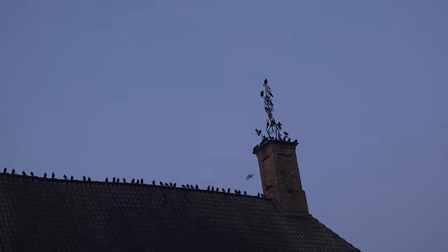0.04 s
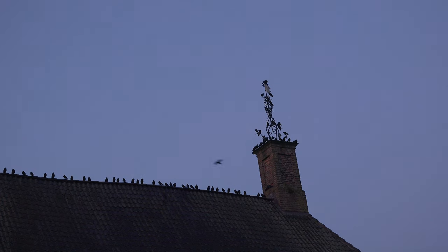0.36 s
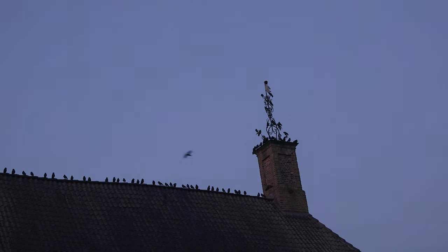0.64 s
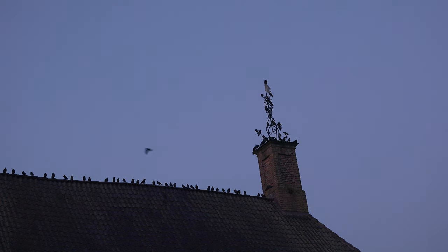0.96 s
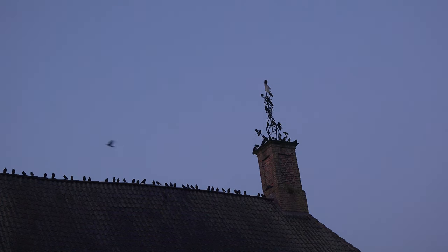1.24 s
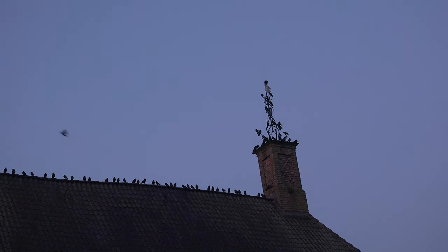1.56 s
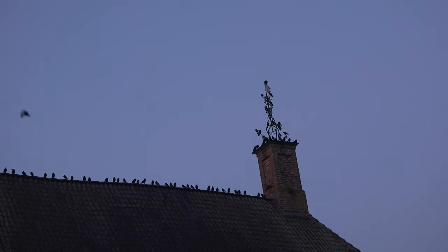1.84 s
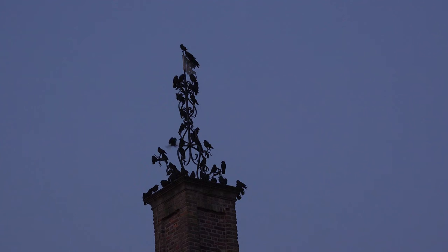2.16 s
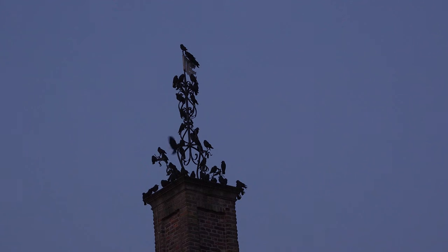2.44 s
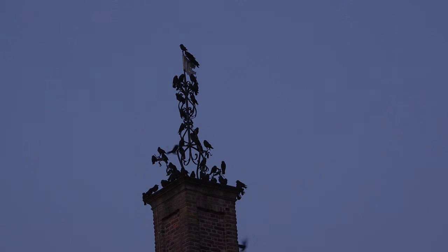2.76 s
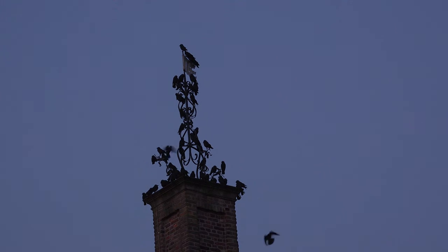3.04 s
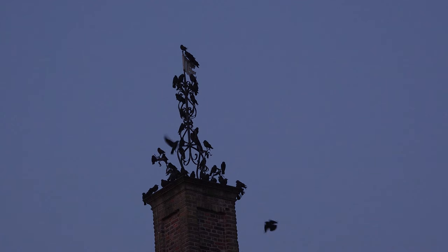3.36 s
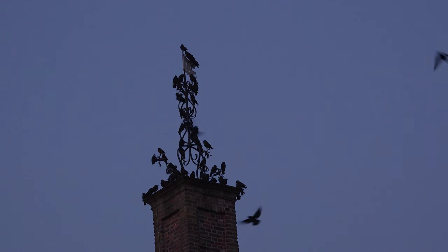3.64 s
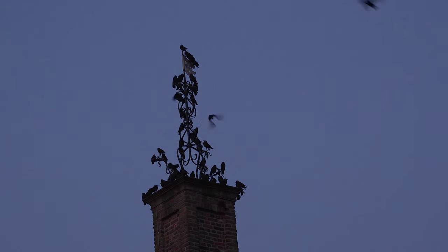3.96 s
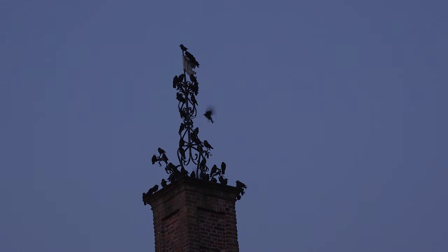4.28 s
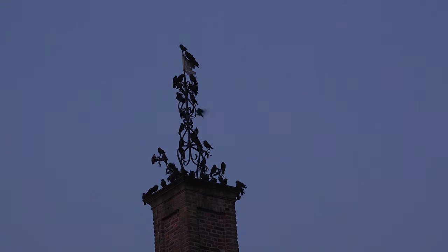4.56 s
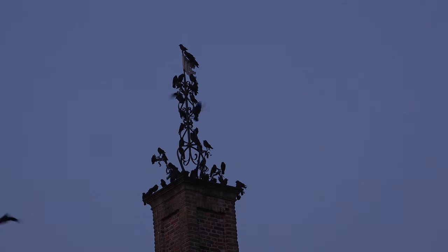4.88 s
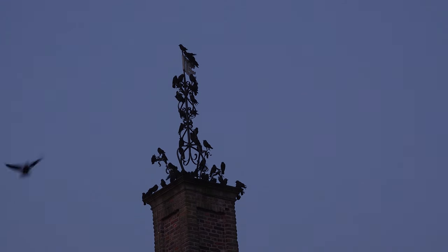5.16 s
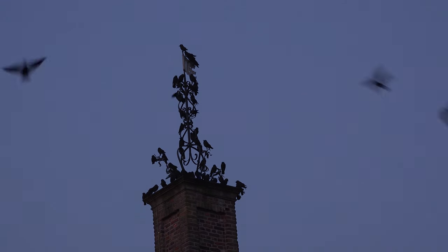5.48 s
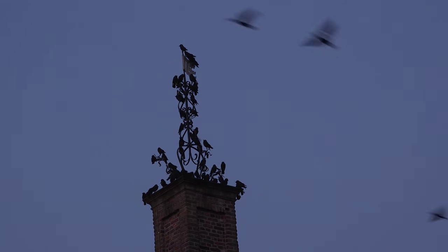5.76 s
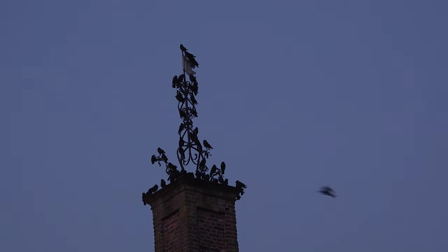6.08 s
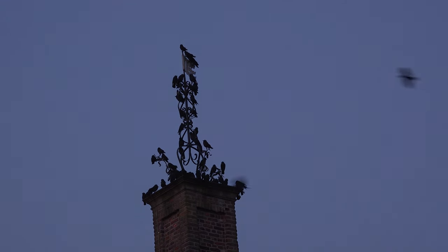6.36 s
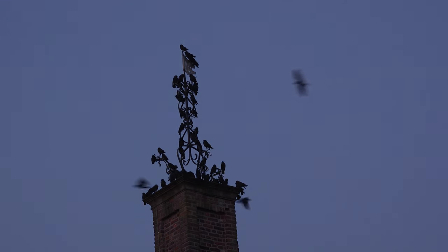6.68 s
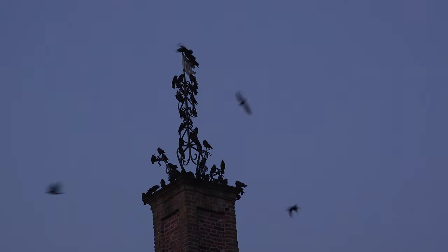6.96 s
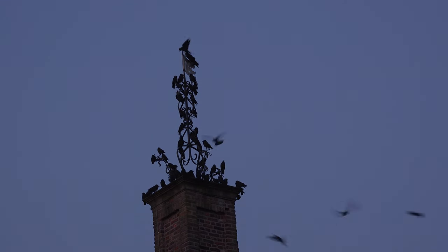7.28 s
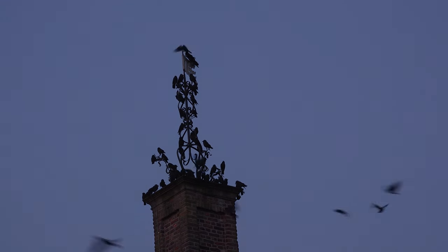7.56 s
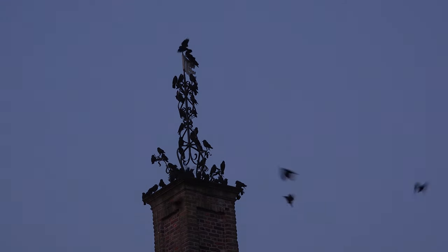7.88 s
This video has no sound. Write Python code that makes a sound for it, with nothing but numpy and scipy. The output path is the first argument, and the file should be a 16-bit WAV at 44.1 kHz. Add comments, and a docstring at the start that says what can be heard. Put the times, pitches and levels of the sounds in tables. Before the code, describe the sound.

Jackdaws call from a rooftop with short, harsh cries that drop in pitch, each echoing briefly off nearby walls. The calls are scattered at first, with a faint airy rustle, then become louder and denser from about three seconds as a more distant flock chatters behind them. Small birds add a few thin whistles. A quiet town murmur and a low, distant engine hum lie underneath.

```python
"""At dusk a town murmurs, with a distant engine and an idling machine humming low in it.
Jackdaws call from a roof ridge: each 'tchak' is a harmonic cry that plunges as the syrinx slackens,
and roofs and walls reflect it a moment later. Small birds whistle thinly further off.
An airy rustle swells and fades over the first three seconds, and the calls thicken as birds fly in.
Past halfway the engine comes up, then slowly gathers speed under the chattering flock."""
import sys
import numpy as np
from scipy import signal
from scipy.fft import rfft, irfft, next_fast_len
from scipy.io import wavfile

SR = 44100
rng = np.random.default_rng(int(sys.argv[2]) if len(sys.argv) > 2 else 0)


def wav_record(signal):
    """Record a signal, one row per channel, as 16-bit PCM in the file named by sys.argv[1]."""
    frames = np.transpose(np.atleast_2d(signal))
    bounded = np.clip(frames, -1, 1)
    # unit amplitude maps onto the largest positive 16-bit level
    quanta = np.round(bounded * 32767).astype(np.int16)
    wavfile.write(sys.argv[1], SR, quanta)


N = 353682
TOP_HZ = 15750
USUAL_DB, USUAL_FALL_S, USUAL_HZ = -32, .05, 1320  # an ordinary jackdaw call

# spectrum of the town's murmur: (frequency [Hz], relative density [dB])
TOWN_SPECTRUM = [(15, -42), (25, -23), (42, -5), (107, 2.5), (169, 2), (260, -10.5), (421, -12.5),
                 (826, -11), (1340, -8.5), (1660, -11), (2360, -9), (3170, -14), (5010, -16.5),
                 (10100, -31), (12800, -29), (15500, -39)]
# distant engine: (time [s], firing rate [Hz], fundamental level [dB], second harmonic re first [dB])
ENGINE_RUN = [(0, 62, -64, 6), (4.55, 62.5, -63, -6), (4.7, 62.6, -53.5, -14), (6, 62.7, -54, -28),
              (6.6, 63.4, -58.5, -15), (7.3, 69.6, -58, -20), (7.55, 72, -63.5, 16.5), (8.02, 76, -59, -1)]
# second harmonic of the idling machine: (time [s], level [dB])
HUM_LEVEL = [(0, -57), (2.3, -62), (2.7, -48.5), (4.6, -52), (6.3, -56), (8.02, -76)]
# resonances of throat and bill for a call at USUAL_HZ: (frequency [Hz], gain [dB])
THROAT_RESONANCES = [(380, -22.5), (560, -16), (800, -22.5), (1200, -7.5), (1550, 2.5), (2000, -1),
                     (2500, 2.5), (3150, -11.5), (4000, -8.5), (5200, -8), (6700, -17), (8100, -21.5),
                     (10000, -34.5), (14000, -50.5), (16000, -64)]
# near calls: (time [s], starting pitch [Hz], fall time [s], starting roughness [0-1], level [dB],
# bill opening [dB], treble [dB]); an open bill turns 'kya' to 'chak', a bird facing us has more treble
JACKDAW_CALLS = [(.013, 1286, 0.043, .03, -46.5, 0.5, -12), (.189, 1316, 0.047, 0.045, -39.5, 3, -19),
                 (.385, 1234, 0.028, 0.14, -34.5, 4, -4), (.588, 1420, 0.037, .02, -28.5, -15, -23),
                 (.619, 1435, 0.046, 0.25, -31, -5.5, -6), (.63, 1060, 0.041, .1, -36.5, 3.5, -18),
                 (.668, 1313, 0.037, .15, -39.5, -7.5, -6), (0.674, 997, 0.033, .06, -33.5, -0.5, -35),
                 (0.725, 980, 0.042, .15, -57, 4.5, -17), (0.88, 1500, 0.054, 0.17, -45, -11, -3),
                 (0.905, 1327, 0.046, 0.19, -43, 13, -6), (1.271, 1403, 0.09, 0.49, -35, -4, -10),
                 (1.473, 1306, 0.077, 0.43, -44, 1.5, -10), (1.793, 1265, 0.059, 0.32, -38, 7.5, 3.5),
                 (2.186, 1252, 0.036, 0.86, -36.5, -0.5, 4), (2.285, 1370, 0.028, 0.64, -33.5, 9, 2),
                 (2.308, 1103, 0.048, .08, -36, 4, -20), (2.43, 1358, 0.033, 0.5, -34, 0, 5),
                 (2.466, 1290, 0.076, 0.44, -40, 9.5, 3), (2.965, 1369, 0.026, 0.26, -30, -3.5, -7),
                 (3.003, 1338, 0.045, 0.024, -24.5, -2.5, 3.5), (3.039, 1246, 0.019, 0.46, -32, 5, 13),
                 (3.228, 1230, 0.089, 0.52, -41, 5.5, 4), (3.367, 1347, .04, 0.028, -24, -6, 3.5),
                 (3.416, 1243, 0.03, 0.15, -28.5, -2.5, -17), (3.496, 1407, 0.051, 0.12, -30, -8, -3),
                 (3.537, 1440, 0.045, 0.77, -30, 5, 5), (3.612, 1433, 0.044, 0.26, -25.5, -5, 4.5),
                 (3.914, 1309, 0.077, 0.52, -36, 3, 3), (4.006, 1422, 0.11, 0.46, -33.5, -4, 11),
                 (4.114, 1338, 0.034, 0.16, -27, 3, 8), (4.147, 1303, 0.039, 0.29, -29, 0.5, -8),
                 (4.262, 1297, 0.058, 0.48, -41, 12.5, 9), (4.323, 1470, .07, 0.26, -32, 3, 9),
                 (4.351, 963, 0.049, 0.074, -32.5, 5, -5), (4.526, 1265, 0.033, .2, -31, -2.5, 8),
                 (4.57, 1280, 0.044, 0.57, -35.5, 10, 13), (4.804, 1450, .036, 0.31, -29, 6.5, 6.5),
                 (4.859, 1459, .06, 0.43, -31, -3.5, 6.5), (4.915, 1323, 0.054, 0.55, -30.5, 2.5, -2),
                 (4.985, 1105, 0.044, 0.09, -35, -1, -14), (5.123, 1461, 0.036, 0.28, -31, -3, -7),
                 (5.151, 1301, .041, 0.36, -33.5, 8.5, 6.5), (5.266, 1325, 0.045, .22, -34, 2, 8.5),
                 (5.368, 1348, 0.057, 0.32, -28, 5.5, 7.5), (5.433, 1307, 0.053, 0.34, -31.5, 4, -4),
                 (5.555, 1312, 0.061, .2, -41.5, 2.5, 5), (5.751, 1385, 0.044, 0.43, -37, -2.5, 16),
                 (5.775, 1047, 0.069, 0.22, -36.5, 0, 5), (5.885, 1452, 0.051, 0.45, -26.5, 1, 4),
                 (5.986, 1363, .042, .04, -24.5, -2, 10), (6.042, 1325, 0.035, 0.22, -24, -1.5, 5.5),
                 (6.145, 1134, 0.046, 0.1, -37, 6.5, -19), (6.24, 1371, 0.044, .29, -33, 2.5, 2),
                 (6.276, 1240, .04, 0.27, -23.5, -2.5, 1.5), (6.31, 1374, 0.057, 0.29, -31.5, 1.5, 2),
                 (6.342, 911, 0.053, .1, -36, 2.5, -15), (6.64, 939, 0.047, 0.093, -29, 6, 16),
                 (6.662, 1376, 0.033, .16, -24.5, 4.5, 2.5), (6.705, 1280, 0.037, 0.25, -30, 0, -1),
                 (6.77, 1457, 0.031, 0.51, -30, 4, -4), (6.929, 1256, 0.027, 0.28, -20.5, 0, 3.5),
                 (6.947, 1395, 0.045, 0.23, -25.5, -5.5, 1.5), (6.972, 1370, 0.05, 0.41, -30.5, 3.5, 6),
                 (7.02, 945, 0.073, 0.12, -37.5, 5, 7), (7.08, 1319, 0.047, 0.34, -27.5, -2, 5),
                 (7.118, 1336, 0.05, 0.52, -28, -3, 8.5), (7.189, 992, 0.048, 0.3, -33, 6, -3),
                 (7.313, 1260, .039, 0.2, -27.5, 0, 5.5), (7.355, 1180, 0.039, 0.16, -31.5, 3.5, -18),
                 (7.447, 1373, 0.029, 0.61, -25, 1, 16.5), (7.486, 1249, 0.045, 0.44, -31, 6.5, 6),
                 (7.551, 1313, .068, 0.22, -29.5, 0, 2), (7.598, 1272, 0.056, 0.088, -30, -2.5, 0),
                 (7.649, 866, 0.055, 0.26, -40, 2.5, -12), (7.89, 1305, 0.045, 0.54, -37, 2, -2),
                 (7.972, 1261, 0.051, 0.58, -32.5, 4, 7)]
# one call of the far flock, before reflection: (time [s], level [dB])
FLOCK_LEVEL = [(0, -72), (1.4, -48.5), (2.8, -47.5), (3.4, -41.5), (8, -38)]
# first reflections from roofs and walls: (delay [s], gain [dB])
WALL_REFLECTIONS = [(0.01, -12), (0.028, -11.5), (0.044, -7.5), (0.067, -14.5)]
# diffuse echo among the houses: (frequency [Hz], relative gain [dB])
ECHO_SPECTRUM = [(400, 15), (1200, 6.5), (2400, 3.5), (5000, 1), (9000, 3.5), (15000, 0.5)]
# small birds' thin notes, and hoarse jackdaw rasps with a deep quaver (0.056 s, 1.61 s): # (time [s], length
# [s], first pitch [Hz], last pitch [Hz], level [dB], quaver [share of pitch])
WHISTLE_NOTES = [(0.056, 0.073, 4680, 3970, -49, 0.16), (0.351, 0.21, 3690, 3580, -54, 0.029),
                 (.77, 0.18, 2750, 2860, -54, 0.026), (0.982, 0.048, 4960, 4150, -53.5, 0.027),
                 (1.61, 0.054, 4900, 3520, -50, 0.11), (2.57, 0.048, 7740, 6430, -51.5, .01),
                 (2.756, 0.027, 8000, 6200, -55, 0.026), (2.779, .059, 8270, 7700, -53.5, .01),
                 (2.87, 0.019, 3580, 3600, -51, 0.012), (3.114, 0.063, 3280, 3200, -44, 0.038),
                 (3.345, 0.048, 3870, 3800, -39, .02), (3.858, 0.049, 7140, 7170, -51.5, 0.0072),
                 (4.571, 0.077, 3755, 3716, -38, 0.0077), (4.68, 0.077, 2880, 2850, -50.5, .02),
                 (4.73, 0.065, 3170, 3100, -49, 0.019), (6.578, .082, 3940, 4150, -41, .022)]
# swells of rustle: (peak time [s], half width at quarter amplitude [s], level [dB])
RUSTLE_SWELLS = [(.8, 0.19, -55.5), (1.35, 0.24, -48), (2.05, 0.4, -56)]
# width between the ears: (frequency [Hz], side minus mid [dB])
STEREO_WIDTH = [(60, -34), (250, -5), (500, -20.5), (1200, -13), (2400, -29), (4500, -21.5), (8000, 1),
                (13000, -8.5)]
# imbalance between the ears: (frequency [Hz], leftward lean before each ear's weighting [dB])
STEREO_LEAN = [(60, 4.5), (140, 4), (260, -3), (500, -6.5), (1100, -2.5), (4000, -1), (8000, 1.1)]


def undb(db):
    """Decibels to amplitude ratio."""
    return 10 ** (np.asarray(db) / 20)


def unit(x):
    """Normalisation to rms 1."""
    return x / np.sqrt(np.mean(x ** 2) + 1e-20)


def curves(table):
    """Linear interpolation of each column of a time table."""
    s, *columns = np.transpose(table)
    return [np.interp(np.arange(N) / SR, s, c) for c in columns]


def colour(x, points, scale=1):
    """Zero-phase filtering by a curve of (frequency [Hz], gain [dB]), its decibels times scale."""
    size = next_fast_len(len(x) + 512)
    hz, db = np.transpose(points)
    f = np.maximum(np.arange(size // 2 + 1) * SR / size, 1)
    gain = undb(scale * np.interp(np.log(f), np.log(hz), db))
    return irfft(rfft(x, size) * gain, size)[:len(x)]


def wander(n, rate):
    """Random modulation: Gaussian values joined by lines, rate of them a second."""
    at = np.arange(n) * rate / SR
    knots = rng.standard_normal(4096)
    return np.interp(at % len(knots), np.arange(len(knots)), knots)


def add(track, s, sound):
    """Superposition of a sound on a track at time s."""
    i = int(np.clip(s * SR, 0, N - 1))
    track[i:i + len(sound)] += sound[:N - i]


def town(level_db=-47):
    """Broadband noise, weighted to the bass and wavering slightly, is heard as a murmur."""
    return unit(colour(rng.standard_normal(N), TOWN_SPECTRUM)) * undb(level_db + 1.6 * wander(N, 5))


def engine():
    """Periodic firing makes a harmonic series; only the lowest two members carry across the town."""
    hz, db, second_db = curves(ENGINE_RUN)
    phase = 2 * np.pi * np.cumsum(hz * (1 + 0.0076 * wander(N, 6.5))) / SR
    tone = np.sin(phase) + undb(second_db) * np.sin(2 * phase)
    return np.sqrt(2) * undb(db + 0.65 * wander(N, 9.9)) * tone


def machine_hum(second_hz=101.5, fundamental_db=-63):
    """Periodic vibration at idle: the second harmonic swells and fades over a faint fundamental."""
    db, = curves(HUM_LEVEL)
    phase = 2 * np.pi * np.cumsum(second_hz * (1 + 0.005 * wander(N, 5.17))) / SR
    second = undb(db + 0.9 * wander(N, 6)) * np.sin(phase)
    return np.sqrt(2) * (second + undb(fundamental_db) * np.sin(phase / 2))


def syrinx(pitch_hz, fall_s, bend, rough, plunge=.43, jitter=0.064, flutter_db=5):
    """A self-sustained oscillator: as its tension drops, the pitch falls and the buzz breaks up."""
    n = int(.2 * SR)
    t = np.arange(n) / SR
    age = t / fall_s
    rough = np.clip(rough + 0.2 * np.minimum(age, 1.2) ** 1.8, 0, 1)
    hz = pitch_hz / (1 + plunge * np.minimum(age, 2) ** max(bend, .8))
    # the slackening syrinx lurches; uneven cycles smear the upper harmonics first
    lurch = 0.02675 * np.minimum(age, 1.5) * wander(n, 149.1)
    hz = hz * (1 + jitter * rough * wander(n, 911.6) + lurch)
    phase = 2 * np.pi * np.cumsum(hz) / SR
    buzz = np.zeros(n)
    for k in range(1, 15):
        flutter = undb(flutter_db * min((k + 2) / 6, 1) * wander(n, 120))
        buzz += np.cos(k * phase) * (k * hz < TOP_HZ) * flutter
    air = rng.standard_normal(n) * (1 + np.cos(phase))  # one puff a cycle
    source = np.sqrt(1 - rough ** 2) * unit(buzz) + rough * unit(air)
    attack_s = 0.0028 * (1.2 - rough[0])  # harsh calls burst out more abruptly
    envelope = (1 - np.exp(-(t / attack_s) ** 2)) * np.exp(-(age / 1.24) ** 5)
    crackle = undb(5 * rough * wander(n, 220))
    return source * envelope * crackle


def tchak(pitch_hz, fall_s, bend, rough, chest_db, bright_db, treble_db, bill_hz=5320):
    """Source and filter: the falling harmonics of the syrinx slide through the throat's resonances."""
    source = syrinx(pitch_hz, fall_s, bend, rough)
    tuning = (pitch_hz / USUAL_HZ) ** 0.31  # the throat shortens for a high call
    cry = colour(source, [(f * tuning, db) for f, db in THROAT_RESONANCES])
    cry = colour(cry, [(1500, chest_db), (2200, 0.0066), (2800, 0.026),
                       (4000, bright_db), (6500, bright_db), (9500, treble_db)])
    # every bird holds its bill differently: one resonance and many random peaks and notches
    cry = colour(cry, [(bill_hz / 1.12, 0), (bill_hz, 2), (bill_hz * 1.12, 0)])
    ripple = [(f, 4 * min(f / 6000, 1) * rng.standard_normal()) for f in np.arange(1000, 16000, 300)]
    cry = colour(cry, ripple)
    return cry / np.sqrt(np.sum(cry ** 2) / (fall_s * SR))


def near_jackdaws():
    """Direct and reflected sound: fainter birds are further off, so a larger share goes by the walls."""
    direct, to_walls = np.zeros(N), np.zeros(N)
    for s, pitch_hz, fall_s, rough, db, open_db, treble_db in JACKDAW_CALLS:
        loud_db = db - USUAL_DB
        # long, faint, narrow calls have more bend: they hold their pitch before they drop
        bend = 1.8 * (fall_s / USUAL_FALL_S) ** 0.3625 * np.exp(-0.0052 * loud_db - 0.04 * open_db)
        # an open bill lets out more on both sides of the main throat resonance
        chest_db = -2.5 + open_db
        bright_db = -2.5 + 0.43 * open_db + 0.36 * treble_db
        cry = undb(db) * tchak(pitch_hz, fall_s, bend, rough, chest_db, bright_db, treble_db)
        add(direct, s, cry)
        add(to_walls, s, cry * undb(-0.72 - 0.0527 * loud_db))
    return direct, to_walls


def house_echoes(x, early_t60_s=0.24, late_t60_s=1.0, build_s=0.013, facets_per_s=210):
    """Reverberation: a few strong reflections, scattering by gables and chimneys, and a faint tail."""
    t = np.arange(SR) / SR
    facets = rng.choice([-1, 1], SR) * (rng.random(SR) < facets_per_s / SR)
    early = unit(facets) * undb(-60 * t / early_t60_s)
    late = rng.standard_normal(SR) * undb(-19 - 60 * t / late_t60_s)
    build_up = 1 - np.exp(-(t / build_s) ** 2)
    scatter = colour((early + late) * build_up, ECHO_SPECTRUM)
    response = undb(-3) * unit(scatter) / np.sqrt(SR)
    for delay_s, db in WALL_REFLECTIONS:
        response[int(delay_s * SR)] += undb(db)
    return signal.fftconvolve(x, response)[:N]


def far_jackdaws(count=80):
    """Superposition of duller calls at random times: a chatter that grows louder as birds fly in."""
    level_db, = curves(FLOCK_LEVEL)
    out = np.zeros(N)
    for i, (when, pitch, fall, bill) in enumerate(rng.random((count, 4))):
        cry = tchak(1050 + 420 * pitch, .04 + .035 * fall, bend=1.7, rough=.55,
                    chest_db=0, bright_db=-2, treble_db=-8, bill_hz=3800 + 2000 * bill)
        add(out, (i + when) / count * N / SR, cry)
    return out * undb(level_db)


def whistles_and_rasps(quavers_per_s=800):
    """Frequency modulation of gliding tones: a slight quaver leaves them pure, a deep one hoarse."""
    out = np.zeros(N)
    for s, length_s, first_hz, last_hz, db, quaver in WHISTLE_NOTES:
        progress = np.linspace(0, 1, int(length_s * SR))
        glide_hz = first_hz + (last_hz - first_hz) * progress
        hz = glide_hz * (1 + quaver * wander(len(progress), quavers_per_s))
        envelope = np.sqrt(progress * (1 - progress))
        add(out, s, undb(db) * unit(np.sin(2 * np.pi * np.cumsum(hz) / SR) * envelope))
    return out


def rustle(rest_db=-75):
    """Amplitude modulation of airy noise: it flickers, and swells out of near silence."""
    t = np.arange(N) / SR
    swells = sum(undb(db) / (1 + ((t - s) / width_s) ** 2) ** 2 for s, width_s, db in RUSTLE_SWELLS)
    hiss = colour(rng.standard_normal(N), [(600, -37), (2000, -2), (5500, 3.5), (9000, 0), (15000, -13)])
    flicker = undb(3.1 * wander(N, 23.8))
    return unit(hiss) * (undb(rest_db) + swells) * flicker


def spread(mid, decay_s=.014):
    """Decorrelation: sound reaches left and right by different paths, most unlike in the treble."""
    t = np.arange(2048) / SR
    paths = rng.standard_normal(len(t)) * np.exp(-t / decay_s)
    scattered = signal.fftconvolve(mid, paths / np.linalg.norm(paths))[:N]
    side = colour(scattered, STEREO_WIDTH)
    return np.array([colour(mid + side, STEREO_LEAN, 0.14), colour(mid - side, STEREO_LEAN, -0.78)])


def scene():
    """Linear superposition: the birds and their echoes add to the sounds of the town."""
    direct, to_walls = near_jackdaws()
    whistles = whistles_and_rasps()
    chatter = far_jackdaws()  # heard only by way of the walls
    echoes = house_echoes(to_walls + whistles + chatter)
    return spread(direct + whistles + echoes + engine() + machine_hum() + town() + rustle())


def record(dry):
    """Band limiting: a steep low-pass filter removes the treble above TOP_HZ."""
    return signal.sosfilt(signal.ellip(10, .2, 80, TOP_HZ, fs=SR, output="sos"), dry)


dry = scene()
out = record(dry)
wav_record(out)
```